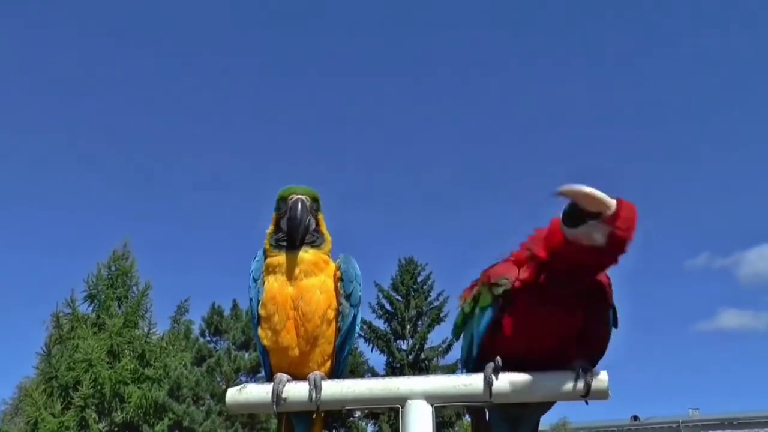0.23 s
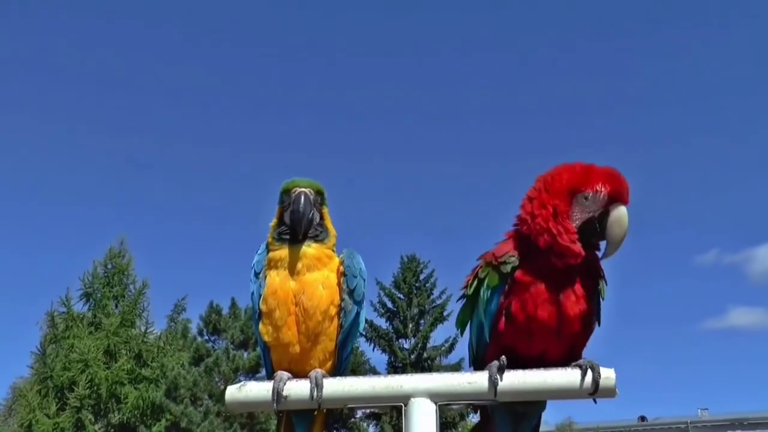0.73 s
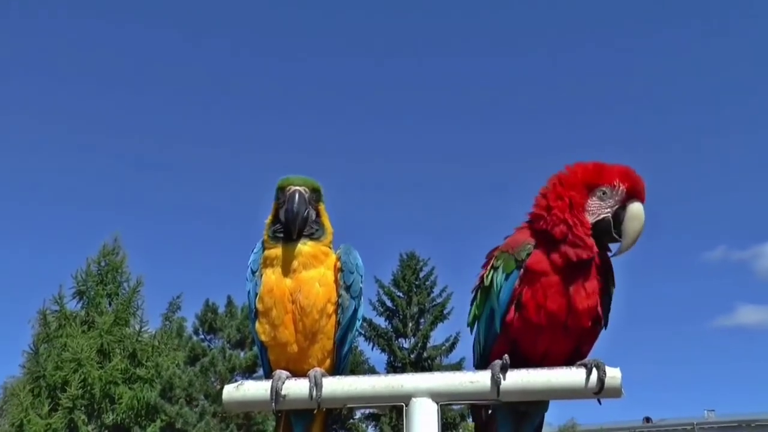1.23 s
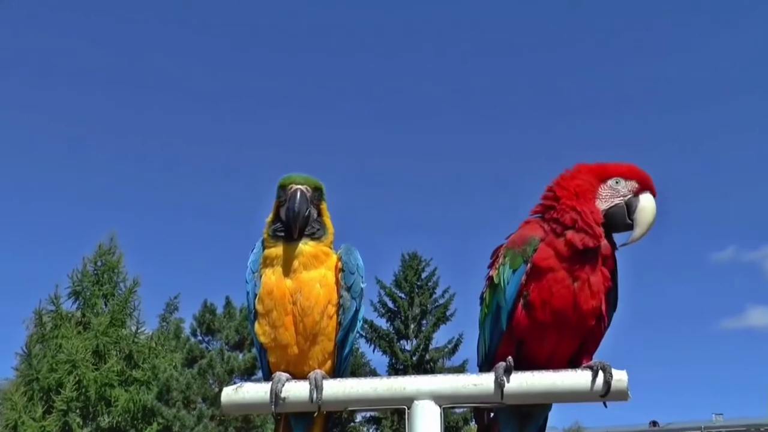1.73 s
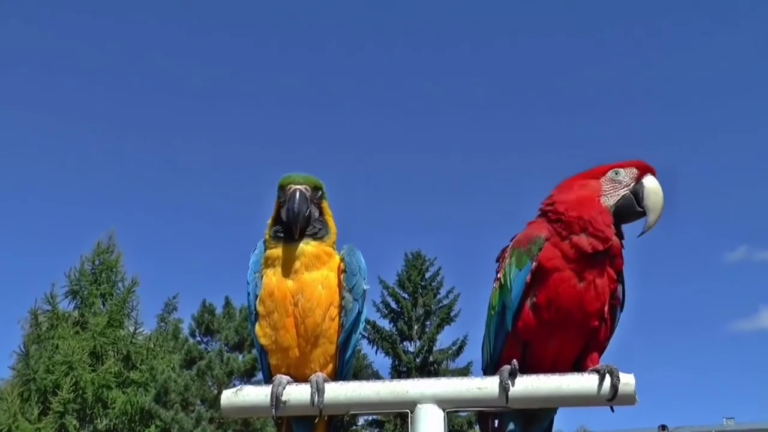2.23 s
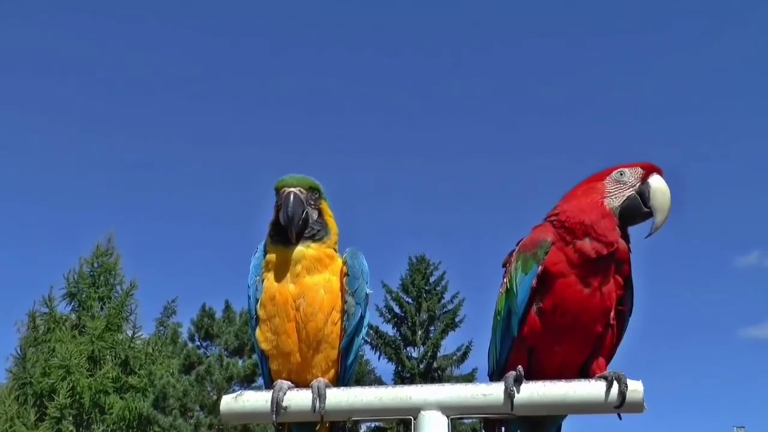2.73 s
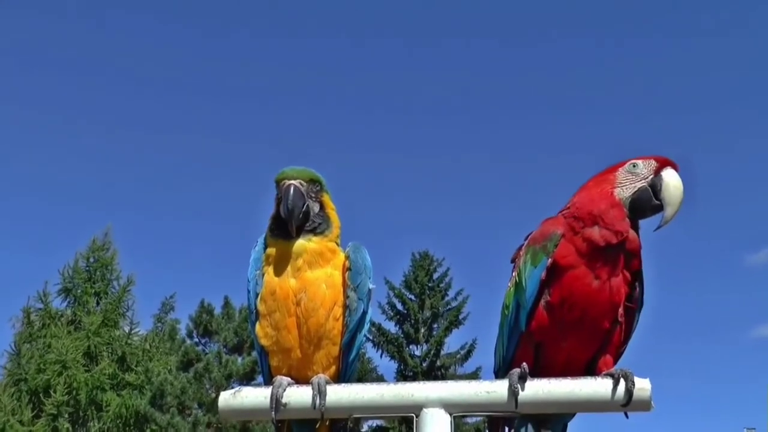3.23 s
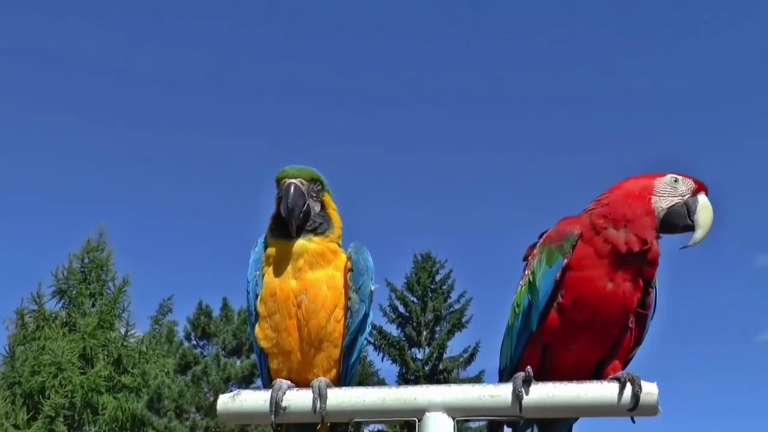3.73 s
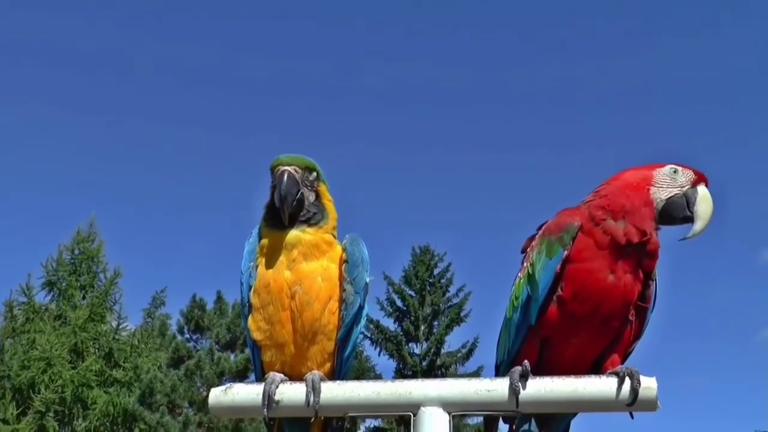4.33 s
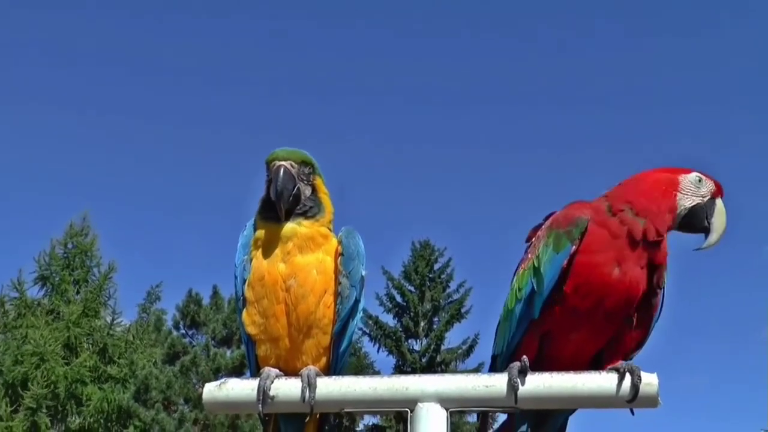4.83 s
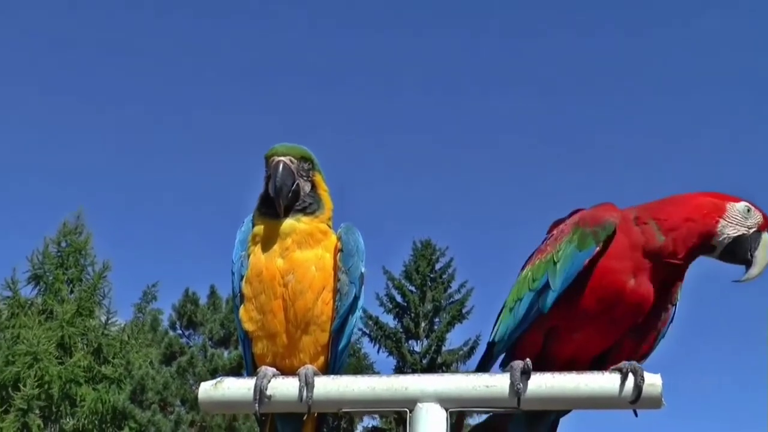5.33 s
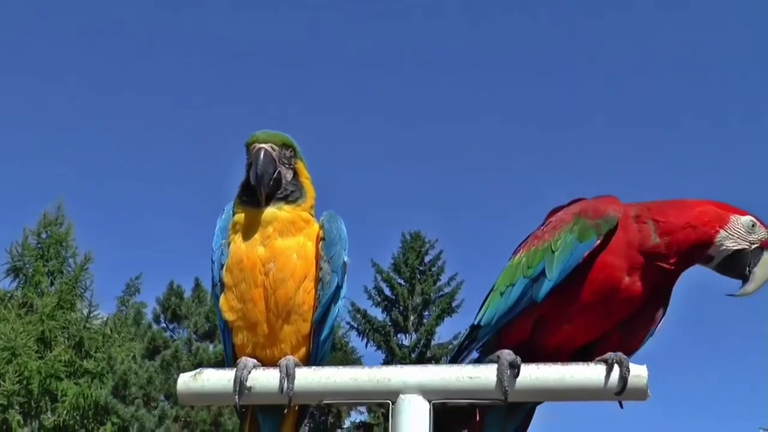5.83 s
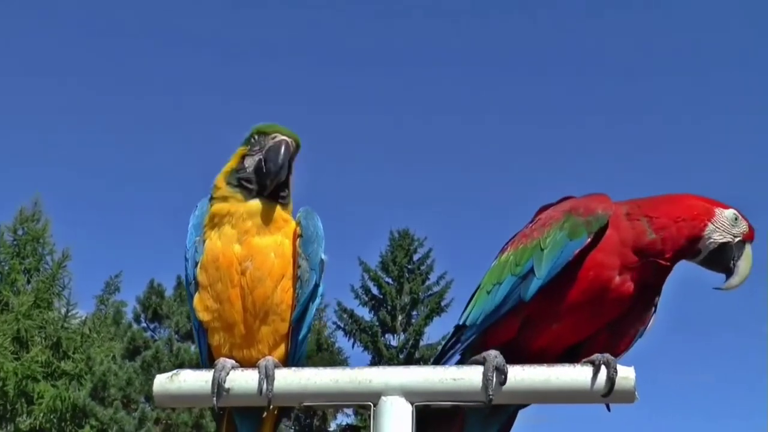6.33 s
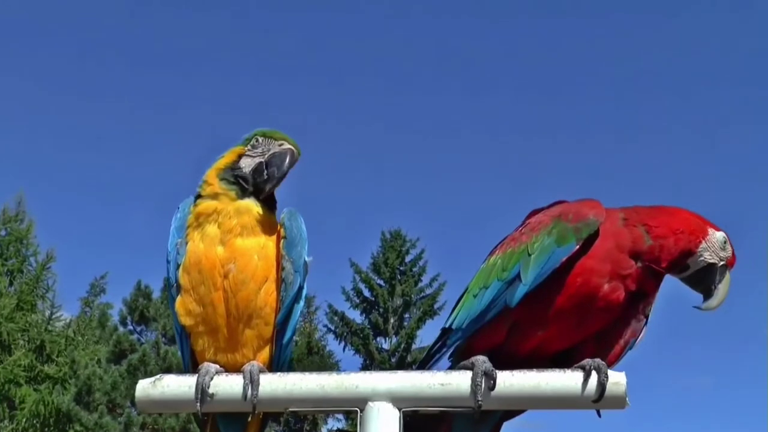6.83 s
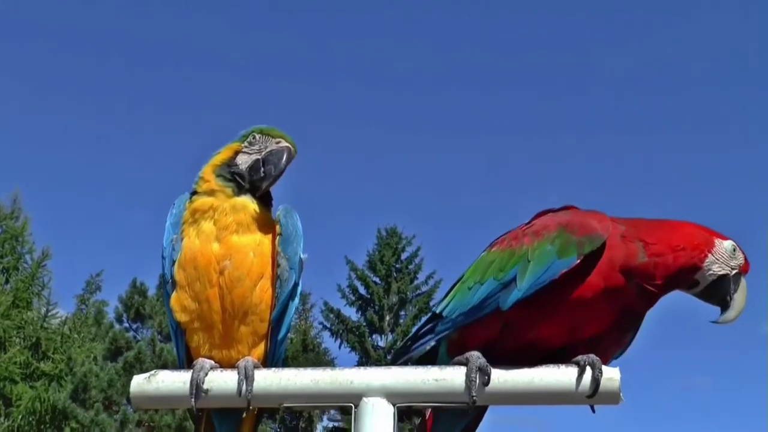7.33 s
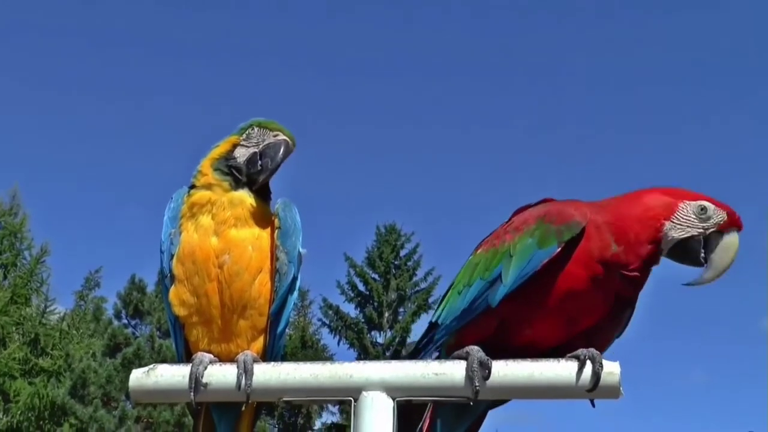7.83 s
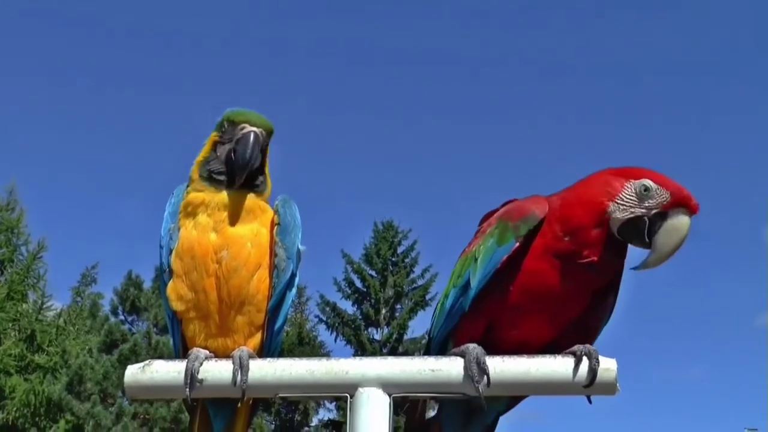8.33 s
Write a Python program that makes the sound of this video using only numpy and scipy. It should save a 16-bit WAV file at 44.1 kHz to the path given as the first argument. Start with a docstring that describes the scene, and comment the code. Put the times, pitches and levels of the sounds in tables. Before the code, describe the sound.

Two large parrots perch close to the microphone in a quiet open yard. After faint ticks and rustling, a thin squeak swoops, climbs and cracks at 0.6 seconds, with falling strokes; a much louder squeak at 0.9 flips from growl to piercing shriek at 1.0. Quiet fidgeting and claw ticks follow, then another squeak at 2.4. More taps lead to a weaker squeak at 3.85 and four harsh, raspy, fluttering screams from 4.0 to 4.6, each about a tenth of a second. A bright squeak at 4.8 runs into soft low clucks until 5.1. Small clucks return at 5.9 to 6.15, then two short screams at 6.25 and 6.4, the second strongest. A clear cluck sounds at 6.8, feathers rustle and a claw ticks around 7.2 to 7.45, and almost inaudible peeps end it. Short echoes, faint air and a weak wavering distant hum remain throughout.

```python
"""Two macaws, close to the microphone on a perch in a garden, squeak in fast gliding whistles.
They cluck in short strings, peep softly and let out six harsh screams: harmonics and rasp through a throat.
Claws and beaks tick in decaying bursts, feathers rustle in grainy noise and the hollow perch booms softly.
The yard answers with short echoes and a faint tail; still air and a distant, wavering hum lie beneath."""
import sys
import numpy as np
from scipy import signal
from scipy.fft import rfft, irfft
from scipy.io import wavfile
from scipy.ndimage import uniform_filter1d, map_coordinates

SR = 44100
rng = np.random.default_rng(int(sys.argv[2]) if len(sys.argv) > 2 else 0)


def to_wav(s):
    """Save 16-bit WAV."""
    ch = np.atleast_2d(s).T  # columns
    pcm = np.round(np.clip(ch, -1, 1) * 32767)  # PCM
    wavfile.write(sys.argv[1], SR, pcm.astype(np.int16))


N = 377937
TIME = np.arange(N) / SR


def from_db(db):
    """Decibels to gain."""
    return 10 ** (np.asarray(db) / 20)


def rms_one(x):
    """Scale to unit power."""
    return x / np.sqrt(np.mean(x ** 2) + 1e-20)


def gain_at(spectrum, hz):
    """Read a (frequency [Hz], level [dB]) table on a log-frequency axis."""
    points = np.array(spectrum)
    log_hz = np.log(np.maximum(hz, 1))
    return from_db(np.interp(log_hz, np.log(points[:, 0]), points[:, 1]))


def colour(x, spectrum):
    """Causal filter with the given spectrum: resonances ring after the sound, never before."""
    size = 2048
    # folding the cepstrum forward gives the minimum-phase response
    cepstrum = irfft(np.log(gain_at(spectrum, np.fft.rfftfreq(2 * size, 1 / SR))))
    cepstrum[1:size] *= 2
    cepstrum[size + 1:] = 0
    response = irfft(np.exp(rfft(cepstrum)))
    return signal.fftconvolve(x, response)[:len(x)]


def wobble(rate_hz, size):
    """Smooth random motion with a spread near 1."""
    steps = np.arange(size) * rate_hz / SR
    return map_coordinates(rng.standard_normal(size), [steps], order=3, mode="nearest")


def noise(spectrum):
    """Steady coloured noise of unit power."""
    return rms_one(colour(rng.standard_normal(N), spectrum))


def even(x):
    """Take the slow level changes out of a voice."""
    power = uniform_filter1d(x * x, size=700)
    return x / np.sqrt(np.maximum(power, 0) + 1e-12)


def with_treble(x, treble_db, split_hz):
    """Remix the bands below and above a split so that the top has the given share."""
    share = from_db(treble_db)
    high_pass = signal.butter(4, split_hz, "high", fs=SR, output="sos")
    top = signal.sosfiltfilt(high_pass, x)
    return share * rms_one(top) + np.sqrt(1 - share ** 2) * rms_one(x - top)


def syrinx(pitch, throat, slope_db, count):
    """Harmonics of a vibrating membrane, each weighted by the throat as it glides; unit power."""
    k = np.arange(1, count + 1)[:, None]
    audible = k * pitch < SR / 2
    gains = gain_at(throat, k * pitch) * from_db(slope_db * np.log2(k)) * audible
    phase = 2 * np.pi * (np.cumsum(pitch) / SR + rng.random())
    return (gains * np.sin(k * phase)).sum(0) / np.sqrt((gains ** 2).sum(0) / 2)


def add(out, start_s, sound):
    """Mix a sound in at a given time."""
    i = int(start_s * SR)
    out[i:i + len(sound)] += sound[:N - i]


def squeaks(start_db=-17, end_db=-13, shimmer=0.96, rasp_db=-7, strain_db=-4, edge_s=.003):
    """Whistles that swoop through the throat resonance and break into rasp."""
    # throat resonance before it follows the tuning: (frequency [Hz], level [dB])
    squeak_throat = [(600, -32), (1150, -23), (1500, -9.5), (2400, 3.5), (3300, 7), (4300, -2.5),
                     (5000, -21.5), (7900, -28), (9800, -47.5), (14000, -63)]
    # air forced through at full effort: (frequency [Hz], level [dB])
    strain_hiss = [(2500, -25.5), (4200, 1.5), (5200, 1.5), (8200, -9.5), (10000, -25.5), (13000, -43.5)]
    throat_follows = .55  # share of a tuning that the throat follows
    jitter = .15
    out, hiss = np.zeros(N), noise(strain_hiss)
    for s, shape, tuning, db in squeak_notes():
        delay, swell, fade, start_hz, peak_hz, end_hz, rough = shape
        start, peak, end = s + np.cumsum([delay, swell, fade])
        span = slice(int(start * SR), int(end * SR))
        t = TIME[span]
        # the pitch flies in and settles as the note reaches its peak
        pitch = peak_hz + (start_hz - peak_hz) * np.clip((peak - t) / swell, 0, 1) ** 1.6
        pitch += (end_hz - peak_hz) * np.clip((t - peak) / fade, 0, 1)
        pitch *= tuning * (1 + jitter * rough * wobble(900, len(t)))
        throat = np.array(squeak_throat) * [tuning ** throat_follows, 1]
        rasp = rms_one(colour(rng.standard_normal(len(t)), throat))
        voice = syrinx(pitch, throat, slope_db=-10, count=2)
        voice *= np.exp(shimmer * rough * wobble(350, len(t)))
        gain = from_db(db + np.interp(t, [start, peak, end], [start_db, 0, end_db]))
        gain *= np.clip(np.minimum(t - start, end - t) / edge_s, 0, 1)
        # the louder the note, the more hiss is forced out with it
        air = from_db(rasp_db) * rasp + from_db(strain_db + db) * hiss[span]
        add(out, start, gain * (voice + rough * air))
    return out


def squeak_notes(foot_db=-12, crack_db=-10, stroke_gap_s=.018):
    """Spell the squeaks out as notes: (start [s], shape, tuning [ratio], peak level [dB])."""
    # Every squeak opens with a whistle, then climbs through foot, ledge and top and cracks an octave down.
    # (start [s], whistle tuning [ratio], low tuning [ratio], whistle [dB], ledge [dB], top [dB])
    openings = [(0.575, .98, 1.02, -30.5, -32.5, -28.5), (0.893, 1.08, 1.22, -18, -16, -14.5),
                (2.434, 1.0, 1.0, -22.5, -23, -20.5), (3.852, .97, 1.05, -28, -34.5, -36),
                (4.771, 1.02, 1.2, -17, -19.5, -28)]
    # most end in two falling strokes and a croak: (start [s], stroke level [dB], croak level [dB])
    falls = [(0.679, -25.5, -33.5), (2.524, -19.5, -31.5), (3.938, -29.5, -46), (4.867, -19.5, -39)]
    # a growl that flips up into a shriek: (start [s], growl tuning [ratio], growl [dB], shriek [dB])
    shrieks = [(0.961, 1.27, -24.5, -10)]
    # note shapes, pitches before tuning and jitter:
    # (delay [s], swell [s], fade [s], start [Hz], peak [Hz], end [Hz], roughness [0-1])
    whistle = (0, .013, .021, 4000, 3380, 3250, .1)
    foot = (.023, .008, .011, 1500, 1680, 1850, .5)
    ledge = (.039, .003, .018, 2550, 2760, 2900, .14)
    top = (.049, .005, .03, 2900, 3230, 3650, .27)
    crack = (.06, .007, .018, 1800, 1650, 1480, .55)
    stroke = (0, .007, .017, 4050, 3250, 2300, .26)
    croak = (.034, .027, .034, 1850, 1620, 1350, .55)
    growl = (0, .019, .02, 1560, 1650, 1750, .45)
    shriek = (.031, .011, .014, 2700, 3380, 3770, .08)
    for s, tuning, low_tuning, whistle_db, ledge_db, top_db in openings:
        yield s, whistle, tuning, whistle_db
        yield s, foot, low_tuning, ledge_db + foot_db
        yield s, ledge, 1, ledge_db
        yield s, top, 1, top_db
        yield s, crack, low_tuning, top_db + crack_db
    for s, stroke_db, croak_db in falls:
        yield s, stroke, 1, stroke_db
        yield s + stroke_gap_s, stroke, 1, stroke_db
        yield s, croak, 1, croak_db
    for s, tuning, growl_db, shriek_db in shrieks:
        yield s, growl, tuning, growl_db
        yield s, shriek, 1, shriek_db


def screams(flutter_hz=160, flutter=0.49, level_db=1.0):
    """The overdriven syrinx beats unevenly and flutters; air rasps through on every beat."""
    # throat with the beak wide open: (frequency [Hz], level [dB])
    scream_throat = [(100, -57), (400, -48), (880, -44), (1150, -30.5), (1400, -25), (1520, -18),
                     (2200, -12), (2950, -4), (3300, 1.5), (3850, -9), (5200, -12.5), (6100, -17.5),
                     (7100, -29), (8300, -37.5), (11800, -49), (13500, -75.5)]
    jitter, waver, rasp_db, throat_sway = .03, .018, 2.5, .016
    gain, pitch, treble_db = scream_controls()
    uneven_pitch = pitch * (1 + jitter * wobble(1100, N) + waver * wobble(70, N))
    cycles = np.cumsum(uneven_pitch) / SR
    # only the upper harmonics stand out of the rasp; the chaotic beat smears each on its own
    tone = np.zeros(N)
    for k in range(4, 11):
        harmonic = np.cos(2 * np.pi * k * cycles + .8 * wobble(260, N))
        tone += harmonic * from_db(4 * wobble(60, N))
    rasp = rms_one(rng.standard_normal(N) * (1 + .5 * np.cos(2 * np.pi * cycles)))
    flutter_cycles = np.cumsum(flutter_hz * (1 + .25 * wobble(120, N))) / SR
    beat = 1 + flutter * np.sin(2 * np.pi * flutter_cycles)
    voice = colour((rms_one(tone) + from_db(rasp_db) * rasp) * beat, scream_throat)
    # beak and tongue move, so all resonances sway together
    read_at = np.cumsum(1 + throat_sway * wobble(55, N))
    voice = map_coordinates(voice, [read_at], order=3, mode="mirror")
    return from_db(level_db) * gain * even(with_treble(voice, treble_db, split_hz=4530))


def scream_controls(rise_s=.0066, fall_s=.011):
    """Gain, pitch and treble share over time: each scream swells, holds, sags and is choked off."""
    # (start [s], length [s], swell [s], relative level [dB], mean share of treble [dB])
    calls = [(3.982, .073, .028, -21.5, -11.5), (4.107, .119, .014, -20.5, -9),
             (4.292, .119, .03, -18.5, -7), (4.491, .117, .012, -19.5, -8),
             (6.256, .066, .034, -18.5, -8.5), (6.373, .047, .026, -15, -13)]
    onset_db, end_db, release_s = -10, -9, .025  # effort swells, holds and lets go
    start_hz, sag_hz_per_s = 850, 170  # pitch sinks as the air runs out
    brighten_db_per_s = 25  # the treble grows through each scream
    gain, pitch, treble = np.zeros(N), [], []
    for s, length, swell, db, treble_db in calls:
        t = TIME[:int(length * SR)]
        effort_db = onset_db * np.clip(1 - t / swell, 0, 1)
        effort_db += end_db * np.clip(1 - (length - t) / release_s, 0, 1)
        edges = np.clip(np.minimum(t / rise_s, (length - t) / fall_s), 0, 1)
        add(gain, s, from_db(db + effort_db) * edges)
        pitch += [(s, start_hz), (s + length, start_hz - sag_hz_per_s * length)]
        swing_db = brighten_db_per_s * length / 2
        treble += [(s, treble_db - swing_db), (s + length, treble_db + swing_db)]
    return gain, np.interp(TIME, *np.transpose(pitch)), np.interp(TIME, *np.transpose(treble))


def clucks(jitter=0.12, rasp_db=-4, level_db=3.5):
    """Brief falling clucks and soft level peeps: membrane harmonics roughened by rasp."""
    # throat: (frequency [Hz], level [dB])
    cluck_throat = [(500, -24), (900, -12.5), (1400, -13.5), (1900, -7.5), (2750, 5.5), (3600, -1.5),
                    (4400, -21), (6000, -26.5), (9000, -44), (13000, -65.5)]
    out, rasp = np.zeros(N), noise(cluck_throat)
    for start, length, start_hz, end_hz, db, rough in cluck_notes():
        span = slice(int(start * SR), int((start + length) * SR))
        u = np.linspace(0, 1, len(TIME[span]))
        pitch = start_hz + (end_hz - start_hz) * u
        pitch *= 1 + jitter * rough * wobble(1200, len(u))
        voice = syrinx(pitch, cluck_throat, slope_db=1.24, count=13)
        voice += from_db(rasp_db) * rough * rasp[span]
        swell = np.abs(np.sin(np.pi * u ** 0.64))
        add(out, start, from_db(db + level_db) * voice * swell)
    return out


def cluck_notes():
    """Clucks fall, peeps hold: (start [s], length [s], start [Hz], end [Hz], level [dB], roughness)."""
    # (start [s], length [s], relative level [dB], roughness [0-1])
    cluck_list = [(4.950, .027, -40.5, .88), (5.009, .018, -40.5, .6), (5.073, .017, -43.5, .58),
                  (5.945, .018, -37, .29), (6.0, .018, -35.5, .29), (6.061, .012, -40.5, .35),
                  (6.152, .019, -41, .5), (6.822, .025, -29, .5), (6.907, .014, -46, .27)]
    # soft level peeps: (start [s], length [s], pitch before jitter [Hz], relative level [dB])
    peeps = [(6.586, .11, 2280, -63), (7.953, .2, 2070, -71), (8.18, .11, 2070, -70),
             (8.31, .22, 1650, -69)]
    mean_hz, drop = 975, .2  # starting pitch at the mean level; share of it lost by the end
    hz_per_db = 8  # louder clucks start higher
    peep_rough = .4
    mean_db = np.mean(cluck_list, axis=0)[2]
    for s, length, db, rough in cluck_list:
        hz = mean_hz + hz_per_db * (db - mean_db)
        yield s, length, hz, hz * (1 - drop), db, rough
    for s, length, hz, db in peeps:
        yield s, length, hz, hz, db, peep_rough


def ticks(t60=0.039, level_db=-6, knock_t60=.06):
    """Claws and beaks tap and scratch in decaying noise; now and then the perch is knocked."""
    # claw and beak ticks: (time [s], relative level [dB], treble against the body [dB])
    taps = [(0.278, -43, -18), (0.503, -41, -18), (1.38, -46, -25), (2.351, -36, -26), (3.063, -32.5, -10),
            (3.162, -42.5, -21), (3.565, -40.5, -35), (3.806, -33, -20.5), (4.717, -38.5, -19.5),
            (7.418, -38, -24)]
    # knocks on the perch: (time [s], level [dB])
    knocks = [(2.352, -51), (6.268, -47.5)]
    # body of a tick, its bright snap and the thud of a knock: (frequency [Hz], level [dB])
    tick_body = [(300, -15.5), (1200, -8.5), (2400, -12.5), (3300, 14), (4300, -7.5), (5800, -14),
                 (9000, -20), (12000, -37), (14000, -52)]
    tick_snap = [(3000, -17), (5500, 3.5), (10000, -15), (12500, -24.5), (14000, -46)]
    knock_body = [(60, 1), (300, -0.5), (900, 7), (1500, -17), (3000, -4), (6000, -30)]
    body, bright, thud = np.zeros((3, N))
    t = TIME[:SR // 4]
    for s, db, treble_db in taps:
        burst = from_db(db + level_db - 60 * t / t60)
        add(body, s, burst)
        add(bright, s, burst * from_db(treble_db))
    for s, db in knocks:
        add(thud, s, from_db(db - 60 * t / knock_t60))
    return body * noise(tick_body) + bright * noise(tick_snap) + thud * noise(knock_body)


def feathers(grain_db=2.0, rise_s=.008, sag_db=-6, release_s=0.02, level_db=-2.0):
    """The birds fidget faintly; each larger shift starts abruptly and rustles away in uneven grains."""
    # faint fidgeting in between: (time [s], relative level [dB])
    fidget_levels = [(0.2, -80), (1.25, -64), (1.9, -71), (2.68, -74), (2.8, -59.5), (3.25, -58),
                     (3.38, -68), (4.7, -64), (5.3, -82), (6.4, -80), (6.8, -60), (7.05, -80), (7.2, -64),
                     (7.5, -58.5), (7.8, -67), (8.55, -65)]
    # a bird shifts its wings: (start [s], length [s], relative level [dB], share of body [0-1])
    rustles = [(0.403, .21, -54, .08), (0.909, .18, -50, .4), (2.277, .15, -55, .03), (3.47, .24, -56, .2),
               (3.768, .19, -53.5, .05), (4.715, .1, -50, .43), (6.215, .05, -47, .08),
               (7.217, .14, -53, .78), (7.35, .1, -45.5, .25)]
    # feather tips, then wing and body: (frequency [Hz], level [dB])
    tip_colour = [(400, -20), (1400, -12), (2400, -6.5), (3300, 5), (4300, -14.5), (5800, -15), (9000, -28),
                  (13000, -40)]
    body_colour = [(170, -30.5), (230, -5.5), (330, -4.5), (450, -3), (1400, -1), (2600, -6.5), (4500, -20),
                   (12000, -46)]
    fidget_share = .2  # share of body
    fidget = from_db(np.interp(TIME, *np.transpose(fidget_levels)))
    tips, body = fidget * np.sqrt(1 - fidget_share), fidget * np.sqrt(fidget_share)
    for s, length, db, share in rustles:
        t = TIME[:int(length * SR)]
        gain = from_db(db + sag_db * t / length)
        gain *= np.clip(np.minimum(t / rise_s, (length - t) / release_s), 0, 1)
        add(tips, s, gain * np.sqrt(1 - share))
        add(body, s, gain * np.sqrt(share))
    grains = from_db(level_db + grain_db * wobble(130, N))
    return (tips * noise(tip_colour) + body * noise(body_colour)) * grains


def perch():
    """The hollow perch's low resonance swells and fades as a bird braces to call."""
    # (start [s], length [s], level [dB])
    booms = [(0.9, .22, -68), (4.5, .42, -70.5)]
    # pipe resonance: (frequency [Hz], level [dB])
    pipe = [(150, -40), (200, -14), (225, 0), (250, -8), (330, -30), (800, -60)]
    gain = np.zeros(N)
    for s, length, db in booms:
        add(gain, s, from_db(db) * np.hanning(int(length * SR)))
    return gain * noise(pipe)


def yard(x, near_db=-13, near_t60=0.19, far_db=-37, far_t60=.7, build_s=0.0033):
    """A few close reflections, scatter from the surroundings and a faint tail from the trees."""
    # near surfaces: (delay [s], level before colouring [dB])
    echoes = [(.0035, -20), (.0045, -13.5), (.0054, -15), (.0072, -18.5), (0.0135, -16.5), (.021, -18)]
    # colour of all that comes back: (frequency [Hz], level [dB])
    yard_colour = [(200, 11), (1500, 4.5), (3400, 3.5), (4600, -1), (7000, -2), (13000, -10)]
    t = TIME[:SR]
    response = np.zeros(SR)
    for db, t60 in [(near_db, near_t60), (far_db, far_t60)]:
        tail = rng.standard_normal(SR) * from_db(-60 * t / t60) * (1 - np.exp(-t / build_s))
        response += from_db(db) * rms_one(tail) / np.sqrt(SR)
    for delay, db in echoes:
        response[int(delay * SR)] += from_db(db)
    return signal.fftconvolve(x, colour(response, yard_colour))[:N]


def background(air_db=-67, waver_hz=2.3):
    """Still air as steady noise, with a distant hum of sines that waver in pitch."""
    # still air: (frequency [Hz], level [dB])
    air_colour = [(20, -8.5), (45, -6.5), (70, -11), (175, -15.5), (230, -11), (480, -9), (750, -14),
                  (1400, -14), (2200, -19), (3300, -15.5), (4300, -24), (8300, -26.5), (10500, -28.5),
                  (12500, -45), (15000, -50.5)]
    # distant machinery: (mean frequency [Hz], level [dB])
    hum_tones = [(285.3, -77.5), (667.5, -78), (8215, -85)]
    hum = np.zeros(N)
    for hz, db in hum_tones:
        cycles = np.cumsum(hz + waver_hz * wobble(35, N)) / SR
        hum += from_db(db) * np.sqrt(2) * np.sin(2 * np.pi * cycles)
    return from_db(air_db) * noise(air_colour) + hum


def scene():
    """The birds, their echoes and the background."""
    birds = squeaks() + screams() + clucks() + ticks() + feathers() + perch()
    return (birds + yard(birds) + background())[None]


def record(dry, cutoff_hz=15000):
    """The top is cut steeply by an elliptic low-pass."""
    low_pass = signal.ellip(10, .1, 80, cutoff_hz, fs=SR, output="sos")
    return signal.sosfilt(low_pass, dry)


dry = scene()
out = record(dry)
to_wav(out)
```